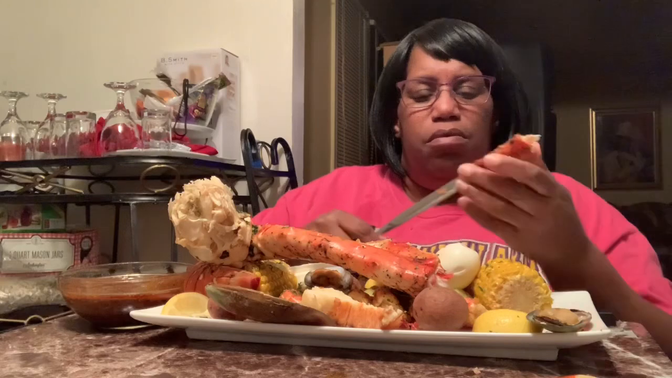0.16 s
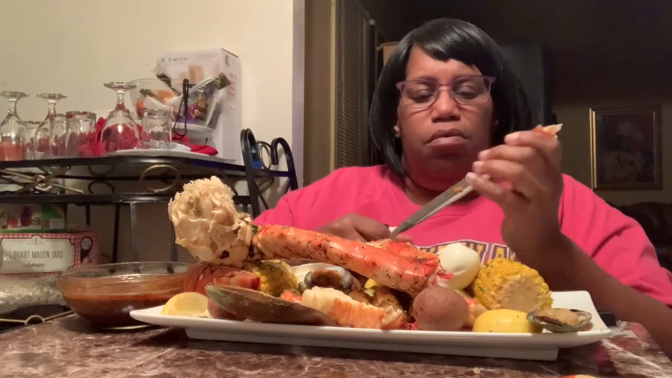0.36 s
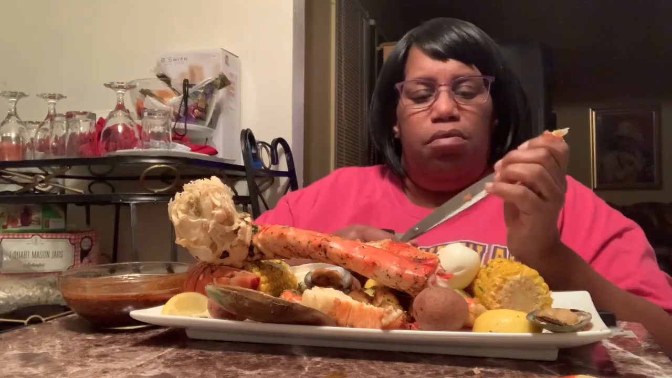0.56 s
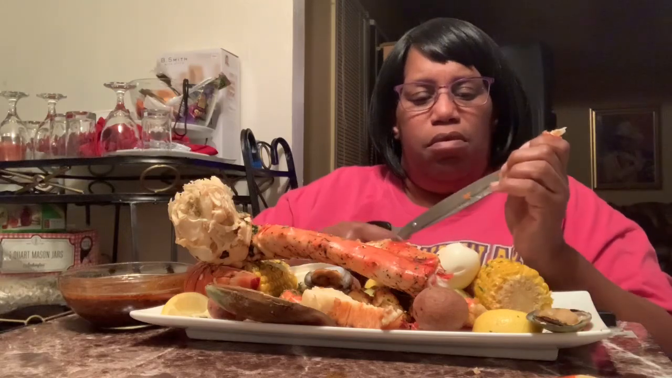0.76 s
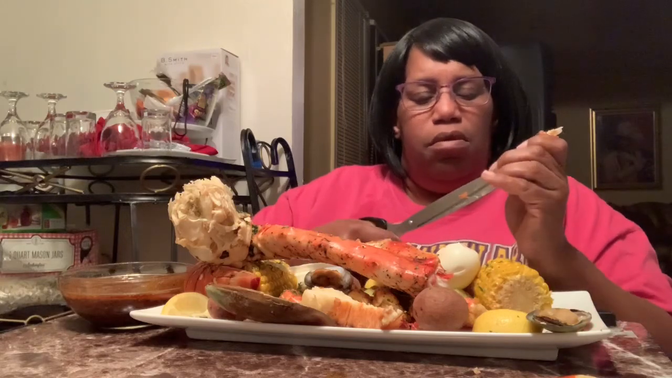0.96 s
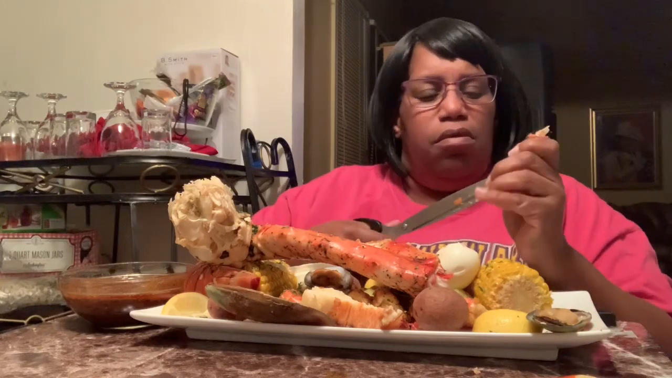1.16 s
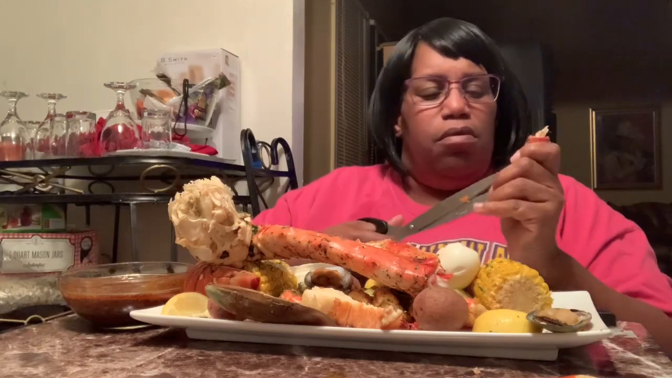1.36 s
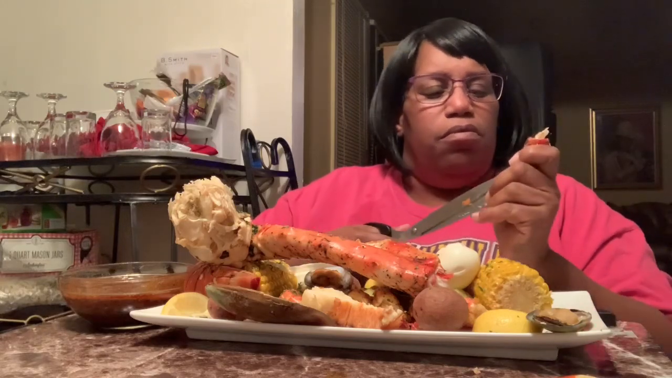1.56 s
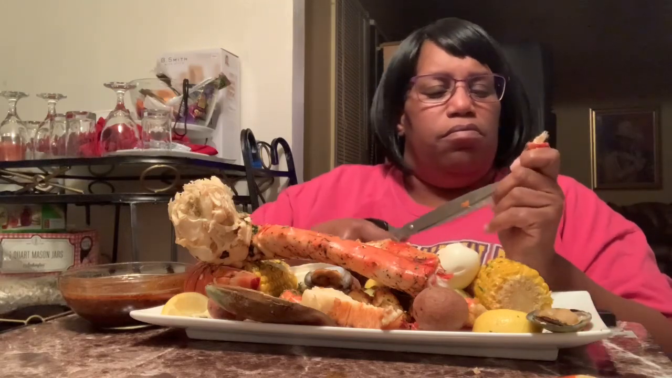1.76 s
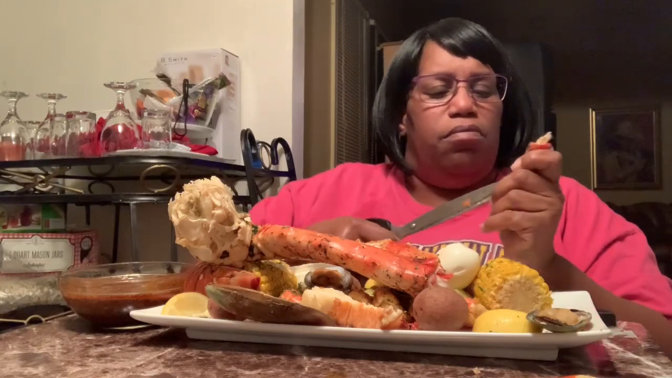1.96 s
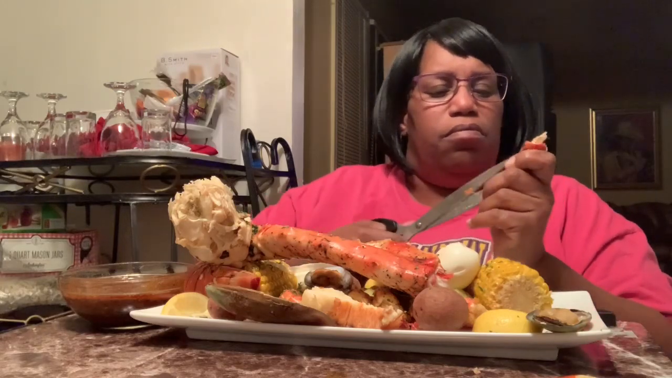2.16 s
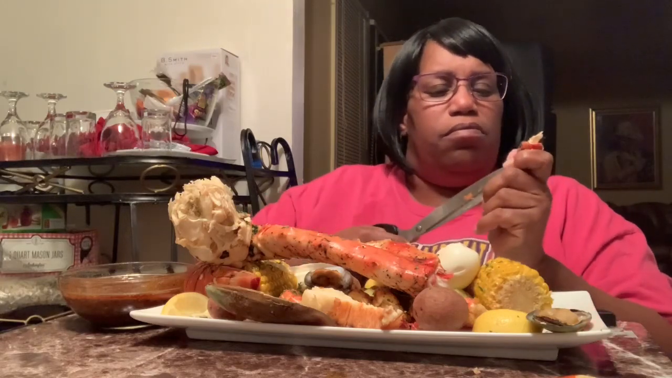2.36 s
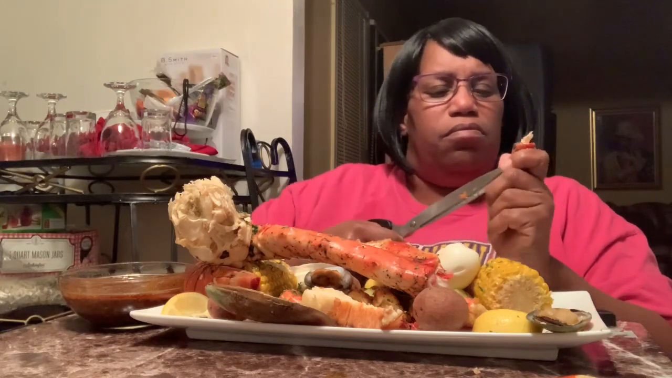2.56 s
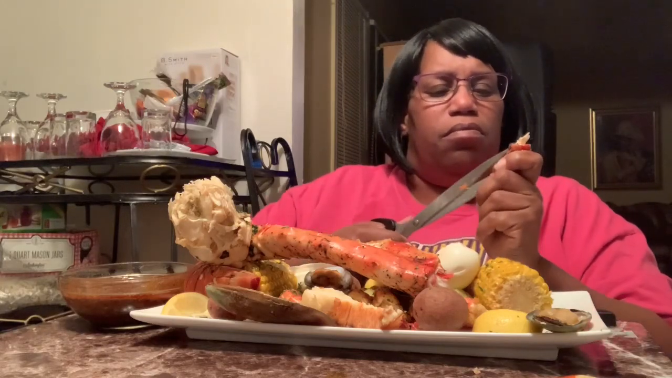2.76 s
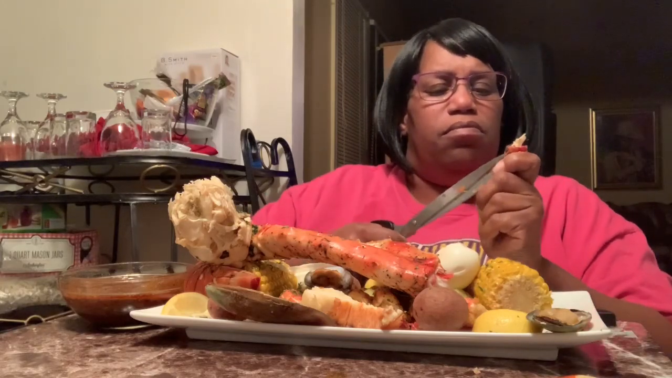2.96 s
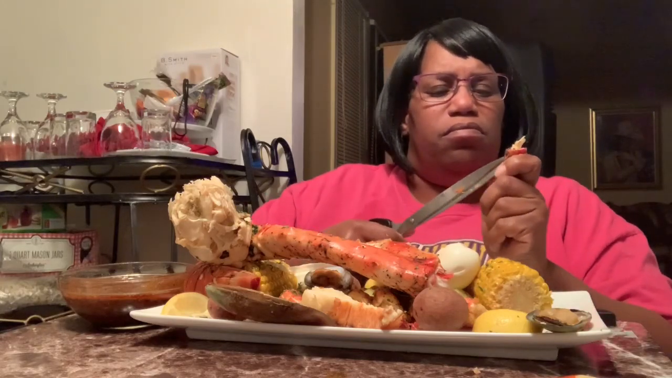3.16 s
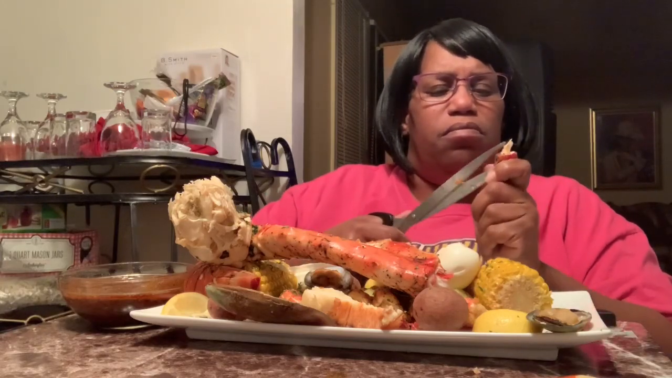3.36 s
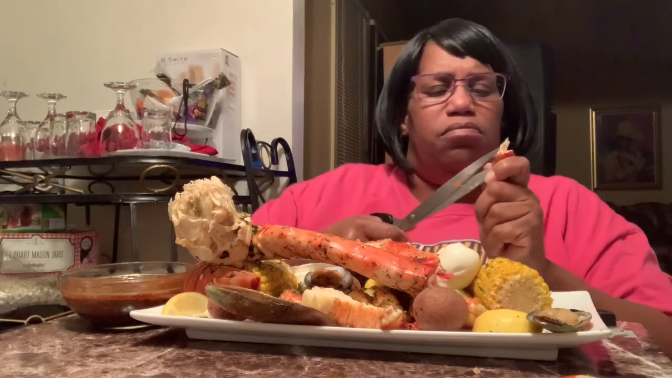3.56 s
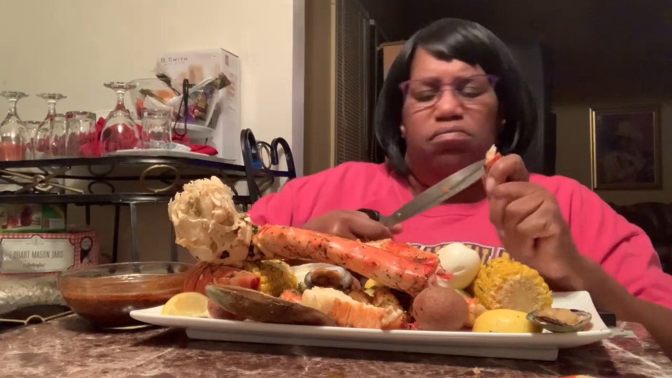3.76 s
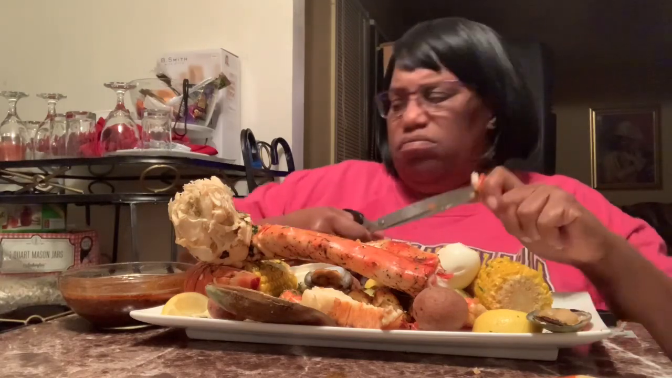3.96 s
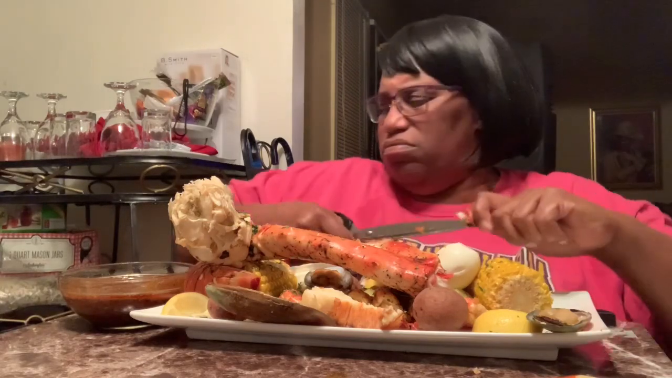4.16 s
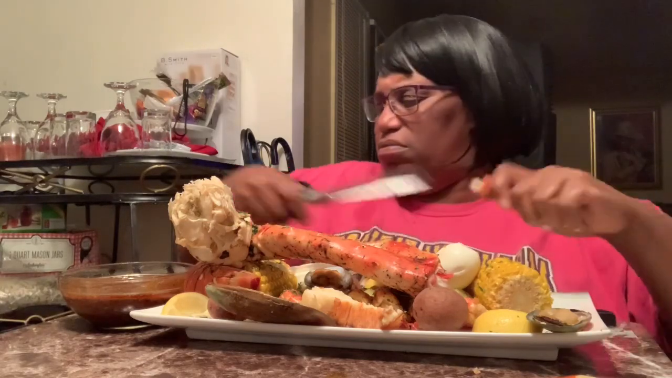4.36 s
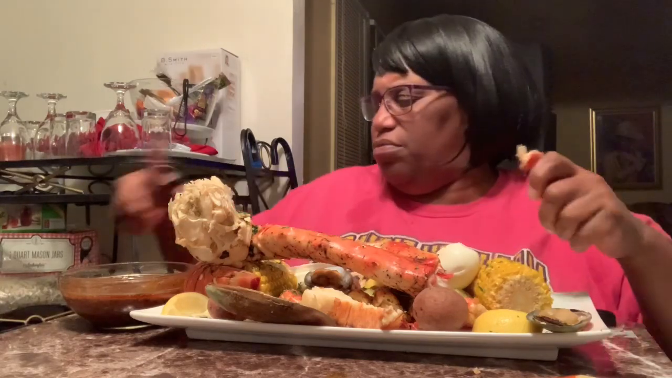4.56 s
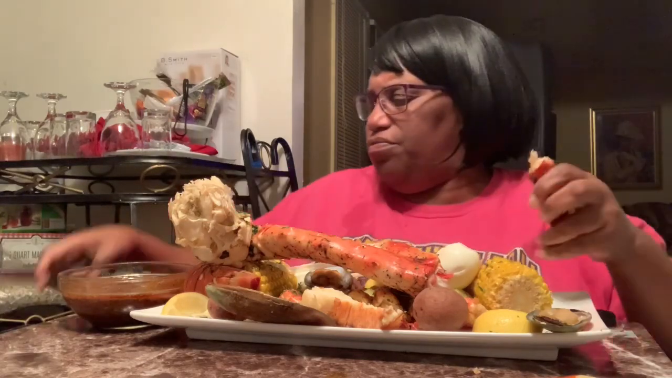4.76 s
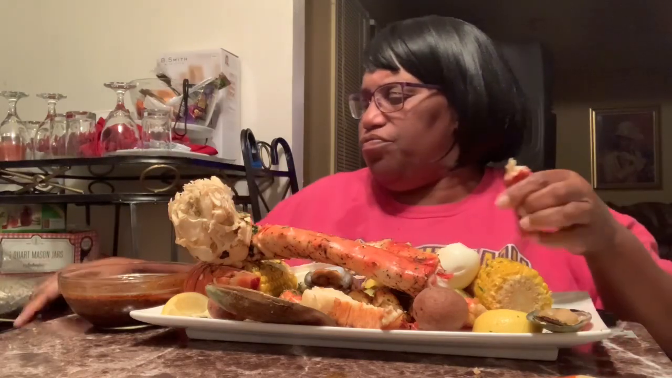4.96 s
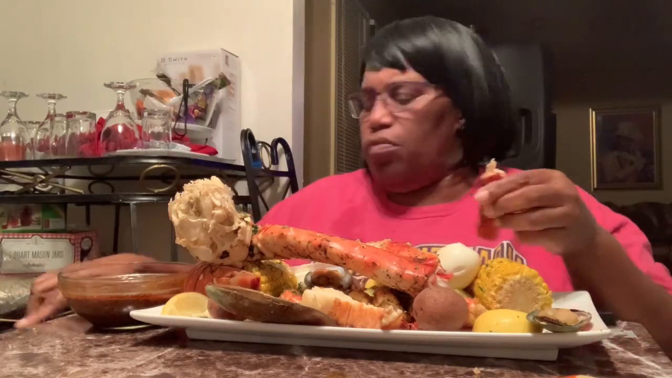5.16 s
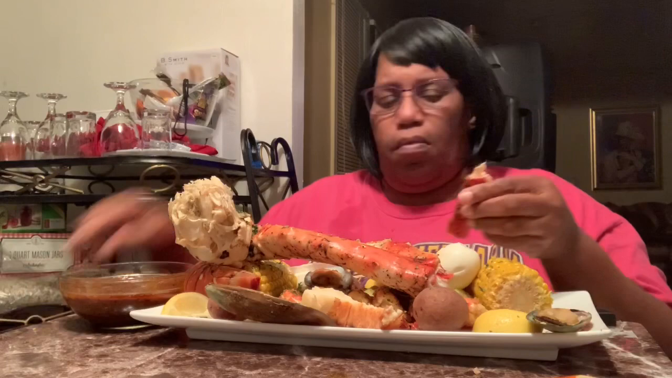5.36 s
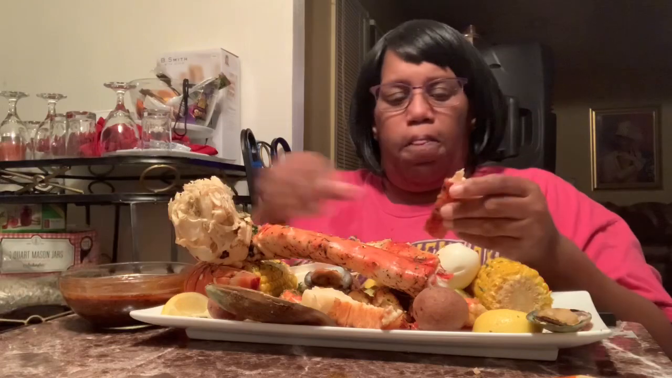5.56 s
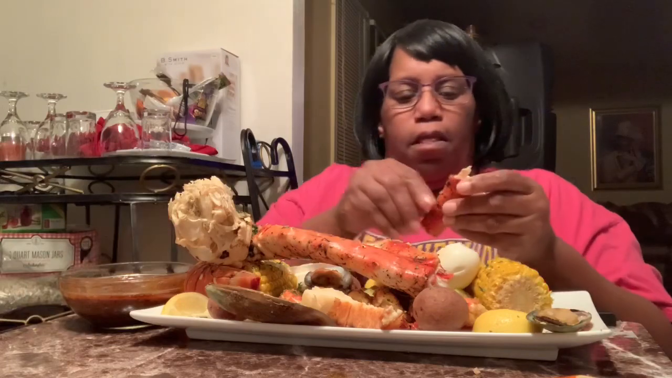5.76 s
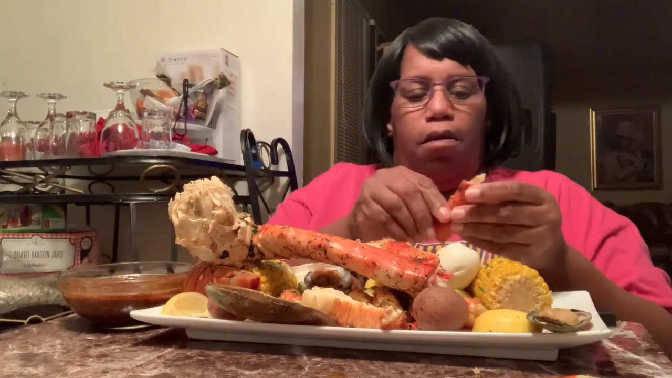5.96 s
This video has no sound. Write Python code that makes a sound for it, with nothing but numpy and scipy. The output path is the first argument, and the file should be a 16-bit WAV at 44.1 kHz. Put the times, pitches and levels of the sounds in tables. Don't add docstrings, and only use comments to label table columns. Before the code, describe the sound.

Heard at arm's length in stereo, brittle crab shell breaks in irregular groups under metal blades: tiny hairline ticks, hard snaps, short grinding crunches and scattered chips. Pauses reveal a soft low household rumble. Then the steel tool touches a stone tabletop, falls flat with a hard ringing clatter and dull slab thud, bounces several times and settles. The lively indoor room gives every impact a brief tail.

```python
import sys
import numpy as np
from scipy import signal
from scipy.fft import rfft, irfft
from scipy.io import wavfile
from scipy.ndimage import uniform_filter1d

SR = 44100
rng = np.random.default_rng(int(sys.argv[2]) if len(sys.argv) > 2 else 0)


def to_wav(sig):
    pcm = np.clip(np.atleast_2d(sig), -1, 1) * 32767
    pcm = np.round(pcm).astype(np.int16)
    wavfile.write(sys.argv[1], SR, pcm.T)


def attenuation_scalar(level_db):
    decades = np.asarray(level_db, float) / 20
    return 10 ** decades


N = 265482
TOP_HZ = 14600


def evened(x):
    return x / np.sqrt(np.mean(x ** 2) + 1e-20)


def read(points, hz):
    f, value = np.transpose(points)
    return np.interp(np.log(hz + 1), np.log(f + 1), value)


def add(mix, start_s, sound):
    part = mix[round(start_s * SR):][:len(sound)]
    part += sound[:len(part)]


def held(stages, s):
    return [row[1:] for row in stages if row[0] <= s][-1]


def ports(x, left_lag, lean_db):
    hz = np.fft.rfftfreq(len(x))
    delay = np.exp(-2j * np.pi * hz * np.array([[left_lag / 2], [-left_lag / 2]]))
    return irfft(rfft(x) * delay, len(x)) * attenuation_scalar(np.array([[lean_db / 2], [-lean_db / 2]]))


def rumble():
    # pitch_hz, level_db (per Hz)
    bed_curve = [(12, -55), (20, -25.5), (48, -16), (101, -10.5), (142, 5.5), (210, -18), (241, 1.5),
                 (277, -23), (310, -8.5), (459, -19), (849, -34.5), (1190, -31), (1530, -40.5), (2600, -39),
                 (7500, -52.5), (16000, -47.5)]
    # pitch_hz, width_hz, level_db
    hums = [(64.8, 4.7, -59.5), (132, 35, -56.5), (157, 75, -68.5), (216, 14, -77.5), (1040, 130, -79)]
    # pitch_hz, likeness (0 to 1)
    likeness = [(60, 0.99), (180, 0.94), (550, 0.63), (1650, 0.3), (4970, 0.28), (15000, 1)]
    # pitch_hz, lean_db
    lean = [(60, 3), (240, 2.5), (950, -3), (3770, -2.5), (15000, 4.5)]
    rumble_db = -50
    frames, hz = N // 512 + 5, np.fft.rfftfreq(2048, 1 / SR)
    a, b, c, d, patches = rng.standard_normal((frames, 1025, 5)).T
    patches = evened(uniform_filter1d(uniform_filter1d(patches, 14, 0), 8, 1))
    same = np.clip(read(likeness, hz), -1, 1)[:, None]
    left = a + 1j * b
    right = same * left + np.sqrt(1 - same ** 2) * (c + 1j * d)
    z = np.array([left, right])
    z *= attenuation_scalar(np.outer([.5, -.5], read(lean, hz))[:, :, None] + 2.3 * patches)
    bed = attenuation_scalar(read(bed_curve, hz)) ** 2
    power = bed / bed.sum() * attenuation_scalar(2 * rumble_db - 8.5)
    for centre_hz, width_hz, db in hums:
        bump = np.exp(-((hz - centre_hz) / width_hz) ** 2 * 2)
        power = power + attenuation_scalar(2 * db) * bump / bump.sum()
    power = power / (1 + (hz / TOP_HZ) ** 60) ** 2
    noise = signal.istft(z * np.sqrt(power)[:, None], nperseg=2048, noverlap=1536)[1][:, :N]
    return evened(noise) * np.sqrt(power.sum())


def fading():
    centre_hz, width_hz, level_db, t60_s = 656, 253, -66.5, 1.9
    hz = np.fft.rfftfreq(N, 1 / SR)
    hush = irfft(rfft(rng.standard_normal((2, N))) * np.exp(-((hz - centre_hz) / width_hz) ** 2), N)
    return evened(hush) * attenuation_scalar(level_db - 60 * np.arange(N) / SR / t60_s)


def causal(gain_db):
    cepstrum = irfft(np.maximum(gain_db, -100) * np.log(10) / 20)
    half = len(cepstrum) // 2
    cepstrum[1:half] *= 2
    cepstrum[half + 1:] = 0
    return irfft(np.exp(rfft(cepstrum)))[:half]


def blow(spectrum, low_db, high_db, ring_hz, knees_hz, ring_db, slips_s, wall=(1e3, 0, 0)):
    hz = np.fft.rfftfreq(2048, 1 / SR)
    low = 1 / (1 + (hz / knees_hz[0]) ** 4)
    high = 1 - 1 / (1 + (hz / knees_hz[1]) ** 4)
    wall_hz, wall_db, hollow_db = wall
    # Hz, dB, width as a share of its pitch; the last is the hollow between wall and shell
    bumps = ((ring_hz, ring_db, .16), (wall_hz, wall_db, .13), (2900, hollow_db, .14))
    ring = sum(db / (1 + ((hz - f) / (share * f)) ** 2) for f, db, share in bumps)
    slips = 0.22 * rng.standard_normal(200) * np.exp(-np.arange(200) / SR / slips_s)
    slips[0] = 1
    colour_db = read(spectrum, hz) + low_db * low + high_db * high + ring
    sound = np.convolve(slips, causal(colour_db))
    return sound / abs(sound).max()


def shell():
    # pitch_hz, level_db (per Hz)
    shell_curve = [(240, -33.5), (400, -9.5), (546, -8), (941, -13), (1430, -7), (1750, -10.5),
                   (3000, -4.5), (3900, -8.5), (5220, -13), (7580, -5.5), (10000, -3.5), (14300, -6),
                   (15200, -16), (16500, -35.5)]
    # start_s, ring_hz, low_body_db, high_fizz_db, room_share_db
    bites = [(.3, 3900, -27, -35, -7), (.45, 9350, -26, 2.5, -9.5), (.81, 4180, -45, -36, -10),
             (.95, 4996, -19.5, -11.5, -4), (1.07, 6780, -73, -5.5, -3.5), (1.23, 4970, -27, -16, -5),
             (1.4, 5300, -3, -10, -11), (1.5, 5400, -24.5, -17, -2.5), (1.59, 6330, -23, -8.5, -4.5),
             (1.675, 8120, -23.5, -6.5, -2.5), (1.716, 5300, -20.5, -2, -2), (1.93, 3280, -20, -7, -0.5),
             (2.14, 3170, -17, -3.5, 1.5), (2.34, 4650, -19, -3, -5.5), (2.41, 4130, -52, -7, -4),
             (2.62, 2380, -22, -18, -3.5), (2.84, 2480, -19, -6, -4), (2.89, 4120, -23, -2.5, -5),
             (2.96, 4400, -25, -5.5, -6), (3.18, 4350, -25, -7, -10), (3.24, 4170, -14.5, -5, -3),
             (3.261, 2870, -14, -3, -7), (3.35, 9200, -5, -3, -1.5), (3.52, 4580, -20, -2, -7),
             (3.62, 4400, -29, -1.5, -5), (3.69, 11000, -26, -9.5, -7), (3.72, 4700, -27, -9, -5.5),
             (3.74, 9000, -28.5, -7, -9), (3.755, 4540, -11, -4.5, -3.5), (3.81, 4450, -18.5, -6, -3.5),
             (3.86, 4720, -22, -10, -5.5), (3.93, 9300, -18, -13.5, -6.5), (3.964, 6780, -21, -2.5, 5),
             (4.18, 3000, -21, -21.5, -4), (4.26, 7250, -38.5, 5, -4), (4.33, 11700, -49.5, -8, -2.5)]
    # start_s, ring_hz, ring_db, hollow_db
    walls = [(.3, 1500, 2.5, 5.5), (.95, 1450, 13.5, -17), (.975, 1500, -12, -6), (1.0, 900, 0, -9),
             (1.03, 1360, -11, -4.5), (1.07, 1500, -6.5, -3), (1.4, 2260, 6, -1), (1.5, 2420, 3, 5.5),
             (1.59, 1490, -6.5, -15.5), (1.675, 3330, 5, -8.5), (1.716, 2360, 3, 5.5),
             (1.73, 1440, 10.5, -3), (1.93, 2000, -1, -9), (2.14, 2110, 11.5, -6.5),
             (2.34, 2200, 12.5, -4.5), (2.41, 2480, 20.5, -7), (2.62, 2360, 4, -4), (2.89, 2030, 19, -2),
             (2.96, 2260, 12, 3), (3.18, 1500, 0, -4), (3.24, 2300, 2.5, 2), (3.52, 2380, 6, 0.5),
             (3.69, 1450, -2.5, 1.5), (3.93, 1490, 5, 5.5), (3.957, 2540, 7, -3.5), (4.18, 2010, -4, 2),
             (4.26, 1500, 25.5, -3)]
    # start_s, peak_db
    cracks = [(.9717, -17), (.9782, -20), (.9878, -24), (1.0092, -22), (1.0161, -17), (1.0218, -21),
              (1.0274, -26), (1.0399, -29), (1.0944, -30), (1.7, -29), (1.7226, -21), (1.7249, -20),
              (1.7401, -25), (1.7501, -29), (2.3722, -31), (2.3898, -17), (2.3976, -26), (2.4292, -31),
              (2.9256, -32), (2.9808, -29), (2.9909, -22), (3.0112, -21), (3.5405, -31), (3.5857, -29),
              (3.589, -30), (3.9536, -14), (3.9592, -23), (3.9679, -25), (4.2839, -30),
              (.509, -69), (.6987, -58), (.8301, -60), (1.2504, -62), (1.441, -65), (1.5182, -59),
             (1.6093, -39), (1.6287, -35), (1.6638, -40), (1.6822, -36), (1.6939, -33), (1.9551, -47),
             (2.1677, -52), (2.3569, -40), (2.3641, -36), (2.48, -38), (2.6416, -46), (2.6709, -43),
             (2.864, -52), (2.9045, -40), (3.2016, -48), (3.2514, -37), (3.3674, -54), (3.6365, -40),
             (3.7285, -39), (3.7709, -33), (3.8313, -40), (3.8758, -40), (4.2003, -48), (4.3505, -46),
              (.376, -66), (.9932, -29), (1.1095, -37), (1.3085, -63), (1.462, -65), (1.477, -65),
                 (1.497, -64), (2.4312, -31), (2.4352, -35), (2.4748, -39), (2.9088, -35), (2.922, -35),
                 (2.9428, -36), (3.2165, -58), (3.2552, -38), (1.64, -38), (1.6489, -42), (1.7097, -32),
                 (1.9713, -53), (2.1598, -60), (2.648, -45), (3.2708, -44), (3.5783, -35), (3.6511, -38),
                 (3.7165, -50), (3.7457, -47), (3.7644, -40), (1.7845, -42), (2.873, -62), (2.879, -60),
                 (3.0255, -34), (3.0996, -48)]
    # start_s, length_s, level_db
    crushes = [(1.417, 0.064, -68.5), (1.682, .034, -43), (1.722, .007, -47), (1.957, 0.017, -64),
               (2.355, 0.038, -43), (2.387, 0.015, -37.5), (2.637, 0.032, -52), (2.9014, 0.03, -39.5),
               (3.24, 0.018, -47.5), (3.536, 0.017, -43), (3.581, 0.014, -41), (3.948, 0.017, -35.5),
               (0.98, 0.047, -46)]
    crumbs_per_s, ring_spread = 1000, 0.059
    loud_db, body_per_db, room_per_db = -17.5, 0.15, 0.114
    near, far = np.zeros((2, N))
    single = [(s, 0, db) for s, db in cracks]
    for s, length_s, db in single + crushes:
        hz, low_db, high_db, room_db = held(bites, s)
        faint_db = loud_db - db
        body_db = low_db + body_per_db * faint_db + 9.0
        ring_hz = hz * (1 + ring_spread * rng.uniform(-0.63, 1))
        snap = blow(shell_curve, body_db, high_db + 0.5, ring_hz, (2400, 7200), 8.96, 0.0018, held(walls, s))
        if length_s:
            luck, size = rng.random(4410), rng.standard_normal(4410)
            crumbs = (size * (luck < crumbs_per_s / SR))[:round(length_s * SR)]
            snap = np.convolve(crumbs, snap)
            faint_db = faint_db + 4.0
        add(near, s - .0002, attenuation_scalar(db + 5.5) * snap)
        add(far, s, attenuation_scalar(db + room_db + room_per_db * faint_db) * snap)
    return near, far


def room(x, level_db, left_lag):
    # pitch_hz, t60_s
    decay = [(150, 0.7), (500, 0.31), (2000, 0.33), (5000, 0.34), (10000, 0.26), (14000, 0.2)]
    turns_per_s = 3.1
    out = np.zeros((2, N))
    for k in range(3):
        taps = np.zeros((3, SR))
        at = np.arange(128, SR - 16, 16) + rng.integers(0, 16, (3, (SR - 129) // 16))
        np.put_along_axis(taps, at, rng.choice([-1., 1.], at.shape), 1)
        hz, t, z = signal.stft(taps, SR, nperseg=256)
        z = z * attenuation_scalar(-60 * t / read(decay, hz)[:, None] + 8.7 * np.exp(-t / 0.0063))
        z = z / (1 + (hz[:, None] / TOP_HZ) ** 120)
        tail = signal.istft(z, SR, nperseg=256)[1][:, :SR // 2]
        tail[:, :200] = 0
        tail = tail[:2] + 0.17 * ports(tail[2], left_lag, 0)
        turn = np.sqrt(2 / 3) * np.cos(2 * np.pi * (turns_per_s * np.arange(N) / SR + k / 3))
        out += signal.fftconvolve((turn * x)[None], tail / np.linalg.norm(tail[0]), axes=1)[:, :N]
    return attenuation_scalar(level_db) * out


def rings(modes, count, split=0):
    t, luck = np.arange(count) / SR, rng.uniform(-1.0, 1, (len(modes), 3))
    detune = 1 + split * rng.uniform(-1.1, 1, luck.shape)
    hz, db, t60_s = np.transpose(modes)[:, :, None, None]
    size = .5 + abs(luck) / 2
    if split:
        size = np.sign(luck) * size / np.sqrt(3)
        t60_s = t60_s * 0.94
    else:
        size = size / 3
    fade = attenuation_scalar(db - 60 * t / t60_s)
    return (fade * size[:, :, None] * np.sin(2 * np.pi * hz * detune[:, :, None] * t)).sum((0, 1))


def shears():
    # pitch_hz, level_db (per Hz)
    steel_curve = [(88, -19.5), (150, -7), (297, -13.5), (414, -9.5), (854, -10.5), (1450, -21),
                   (3040, -10), (4490, -11.5), (7000, -9.5), (9820, -5.5), (13600, -13), (14600, -27.5),
                   (16500, -50)]
    # start_s, peak_db, body_ring_hz
    contacts = [(4.8322, -22.5, 1480), (4.8492, -34, 2260), (4.899, -41, 1450), (4.969, -52.5, 1090),
                (5.061, -22, 2100), (5.0624, -16.5, 2060), (5.077, -26, 1750), (5.0863, -23.5, 2160),
                (5.097, -26.5, 1490), (5.109, -29.5, 1930), (5.1427, -16, 2600), (5.144, -5, 1440),
                (5.1459, -9.5, 1390), (5.1528, -14.5, 1272), (5.1554, -15.5, 1200), (5.163, -21, 1227),
                (5.1721, -18.5, 2600), (5.1761, -23.5, 2037), (5.1963, -11.5, 2020), (5.198, -7.5, 1500),
                (5.2007, -12, 2610), (5.2025, -22.5, 1300), (5.2144, -18.5, 1636), (5.233, -22, 2210),
                (5.235, -9.5, 1790), (5.2559, -19.5, 2210), (5.2598, -11.5, 1760), (5.278, -23, 1720),
                (5.2936, -24, 1660)]
    # start_s, table_thud_db, high_tick_db, handle_ring_db, frame_ring_db
    touches = [(4.81, -13.5, -6, -25.5, -21), (4.842, -17, -23, -40, -21), (5.04, -25, 1, -19.5, -19.5),
               (5.075, -16, -10, -14, -19), (5.12, -24, -8.5, -23.5, -3), (5.159, -13, -11.5, -11.5, -7),
               (5.19, -19, 4, -20.5, -3.5), (5.21, -16.5, -24.5, -16, -8.5), (5.228, -25, -17.5, -26, -9),
               (5.25, -25, -12.5, -23.5, -6.5), (5.27, -25.5, -23, -28, -12.5)]
    # pitch_hz, level_db, t60_s
    frame_modes = [(1440, -4, 0.026), (2020, -6, 0.022), (2650, -2.5, 0.016), (3150, -4, .025),
                   (3900, -13.5, .025), (4015, -14, 0.014), (5230, -7.5, 0.032), (5150, -13.5, 0.0093)]
    # pitch_hz, level_db, t60_s
    handle_modes = [(555, -13.5, 0.14), (900, -7, 0.16), (1200, -6, 0.29), (1400, -15, 0.078),
                    (1790, -3, 0.25), (2075, -4.5, 0.085), (2200, -2.5, 0.11), (2830, -7.5, 0.15),
                    (3135, -17.5, 0.055), (3530, -16, .12), (5200, -14, 0.06)]
    # pitch_hz, level_db, t60_s
    closed_modes = [(876, -9.5, 0.091), (1480, -4.5, 0.084), (2260, 4.5, 0.024), (3700, -8, 0.04),
                    (5100, -6, 0.06), (5960, -7.5, .02)]
    # pitch_hz, level_db, t60_s
    hinge_modes = [(422, -7, 0.42), (515, -3, 0.4), (1450, -2, 0.25), (1085, -12.5, 0.13), (1770, -9.5, .2),
                   (2160, -3, 0.49)]
    split, count = .03, 12000
    clunk_db, clunk_t60_s, clunk_rise_s = -1.5, 0.023, 0.00064
    tip_db, rattle_depth, rattle_s = 1, 1, .004
    t = np.arange(count) / SR
    tips, grips = np.zeros((2, N))
    swell = 1 - np.exp(-t / 0.001)
    for s, db, hz in contacts:
        low_db, high_db, ring_db, frame_db = held(touches, s)
        tick = blow(steel_curve, low_db + 10.5, high_db - 6.0, hz, (900, 3000), 4.2, 0.0026)
        add(tips, s - .0004, attenuation_scalar(db + tip_db) * tick)
        clunk = attenuation_scalar(clunk_db - 60 * t / clunk_t60_s) * np.sin(2 * np.pi * hz * t)
        frame = attenuation_scalar(frame_db) * rings(frame_modes, count, split / 3)
        add(grips, s - .0004, attenuation_scalar(db) * (clunk + frame) * (1 - np.exp(-t / clunk_rise_s)))
        add(grips, s, attenuation_scalar(db + ring_db) * rings(handle_modes, count, split) * swell)
    add(grips, 4.8305, attenuation_scalar(-25.5) * rings(closed_modes, count, split) * swell)
    grain = rng.standard_normal((len(hinge_modes), count))
    flutter = signal.lfilter([1], [1, -np.exp(-1 / (rattle_s * SR))], grain)
    blades = np.zeros(count)
    for mode, chatter in zip(hinge_modes, flutter):
        blades += (1 + rattle_depth * evened(chatter)) * rings([mode], count, split)
    add(grips, 5.063, attenuation_scalar(-26.0) * blades * (1 - np.exp(-t / 0.0075)))
    return tips, grips


def table():
    # pitch_hz, level_db, t60_s
    slab_modes = [(58.1, -14, 0.6), (90.6, -6, 0.62), (139, -0.5, 0.24), (230.7, -7, 0.21)]
    # start_s, level_db
    thuds = [
        (4.831, -30),
        (5.145, -19),
        (5.202, -30),
        (5.681, -34.5),
    ]
    out = np.zeros(N)
    rise = 1 - np.exp(-np.arange(30000) / SR / 0.024)
    for s, db in thuds:
        add(out, s, attenuation_scalar(db) * rise * rings(slab_modes, 30000))
    return out


def scene():
    snaps, thrown = shell()
    tips, grips = shears()
    slab = table()
    near = ports(snaps, 8.0, 0.29) + ports(tips, -2.94, -0.78)
    near = near + ports(grips, -6.0, -0.66) + ports(slab, 3.0, 1.7)
    landing = tips + attenuation_scalar(-7.5) * grips + attenuation_scalar(-25.0) * slab
    return near + room(thrown, 5.66, 12.0) + room(landing, -0.091, -12.5) + rumble() + fading()


def low_pass(x):
    return signal.sosfilt(signal.butter(12, 16810, fs=SR, output="sos"), x)


def record(dry):
    # pitch_hz, boost_db
    width = [(100, 1.5), (400, 4.5), (2000, 0.5), (5000, 1.5), (12000, -2)]
    notch_hz, notch_width_hz, notch_db = 7450, 130, -8
    hz = np.fft.rfftfreq(N, 1 / SR)
    mid, side = (dry[0] + dry[1]) / 2, (dry[0] - dry[1]) / 2
    side = irfft(rfft(side) * attenuation_scalar(read(width, hz)), N)
    dip = attenuation_scalar(notch_db / (1 + ((hz - notch_hz) / notch_width_hz) ** 2))
    wide = irfft(rfft([mid + side, mid - side]) * dip, N)
    ahead = rng.standard_normal((2, 1201)) * attenuation_scalar(-50.5 - 12.0 * np.linspace(2, 0, 1201))
    ahead = ahead * (np.arange(1201) < 600)
    ahead = signal.lfilter(*signal.butter(N=4, Wn=(.04, .36), btype="band"), ahead)
    smear = signal.oaconvolve(wide, ahead * attenuation_scalar(22.0), "same", axes=1)
    return low_pass(wide + smear)


dry = scene()
out = record(dry)
to_wav(out)
```